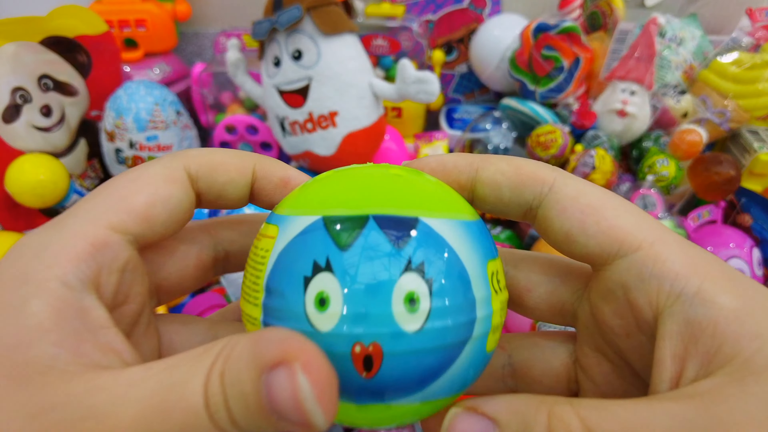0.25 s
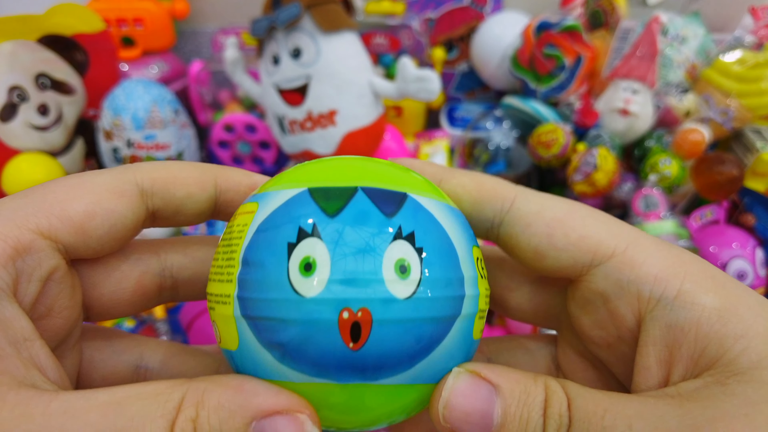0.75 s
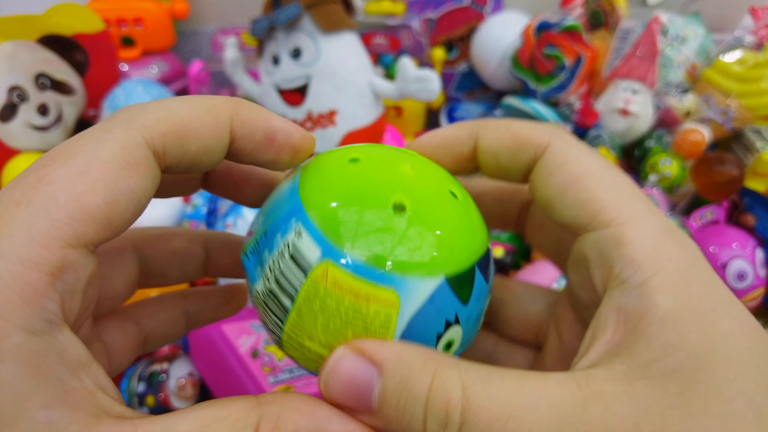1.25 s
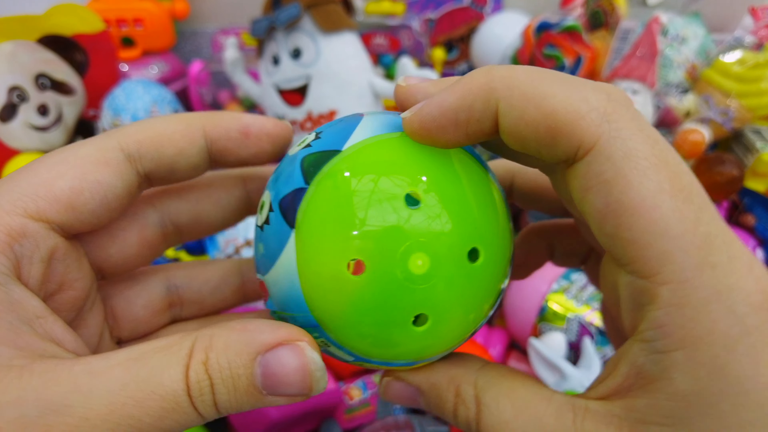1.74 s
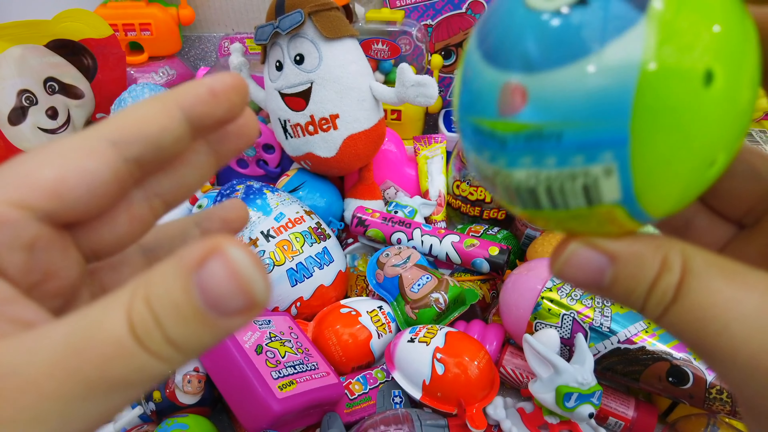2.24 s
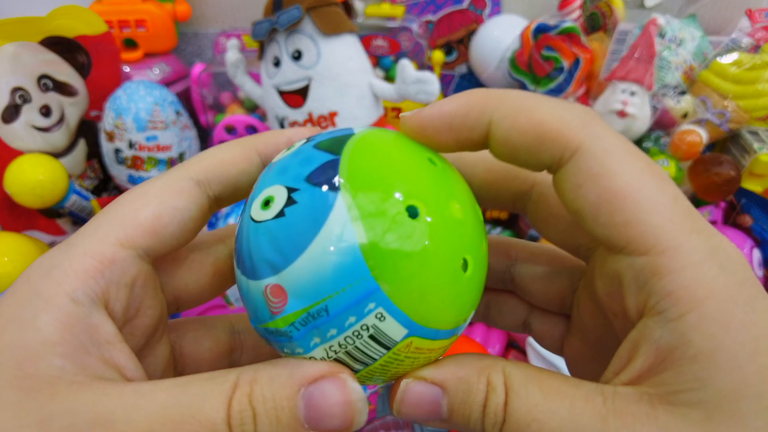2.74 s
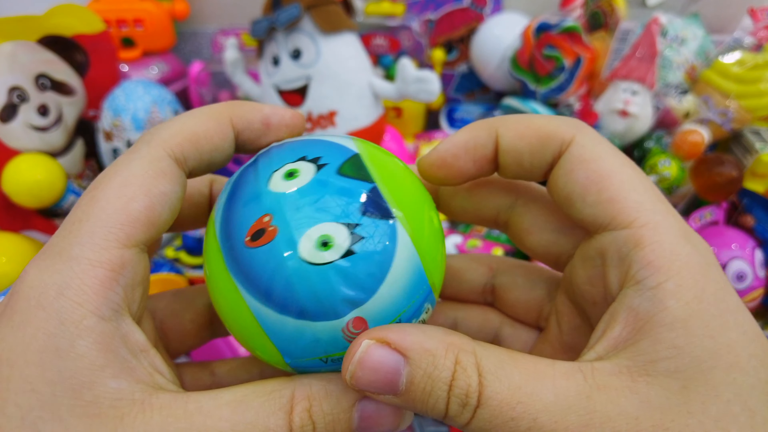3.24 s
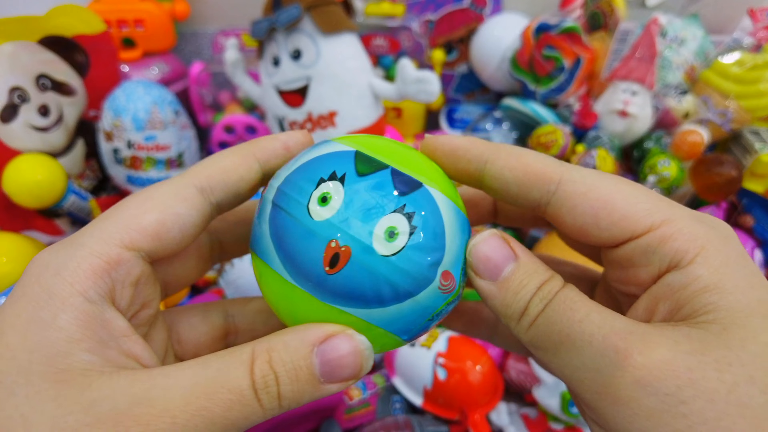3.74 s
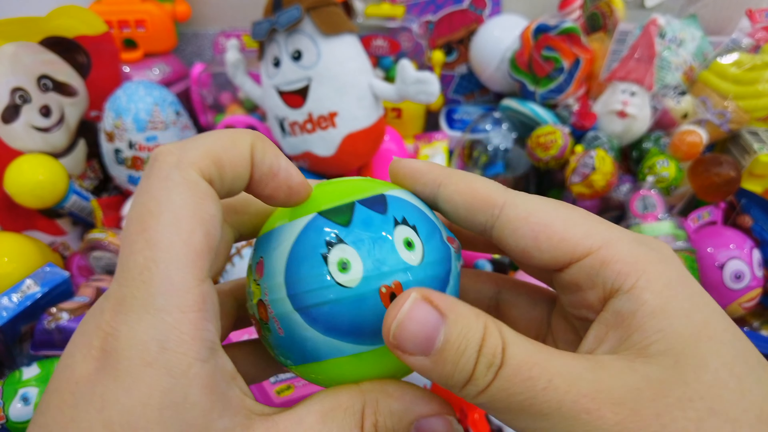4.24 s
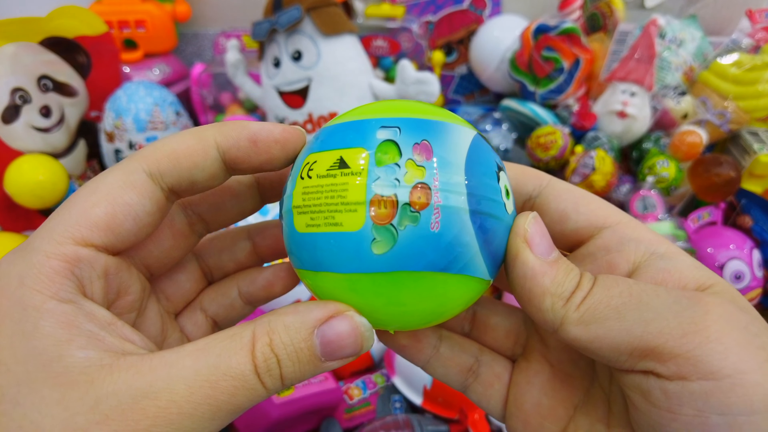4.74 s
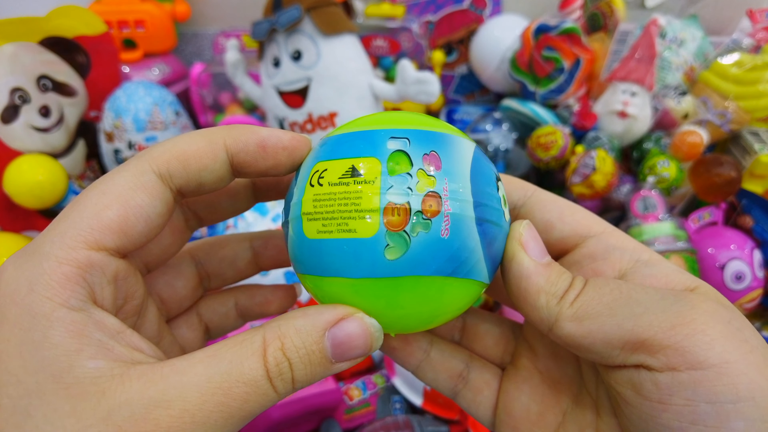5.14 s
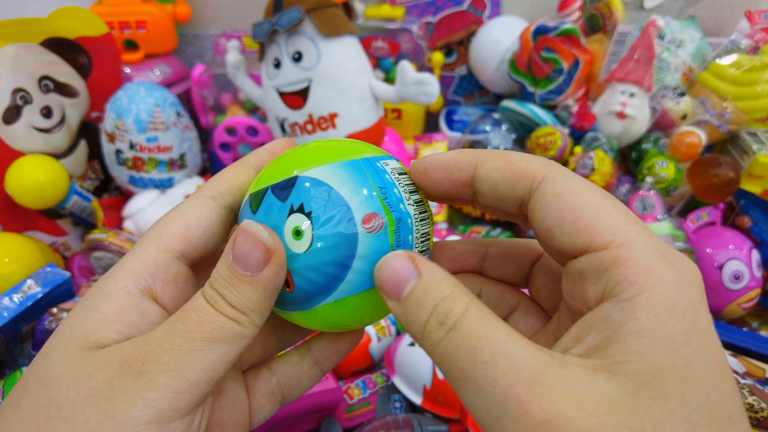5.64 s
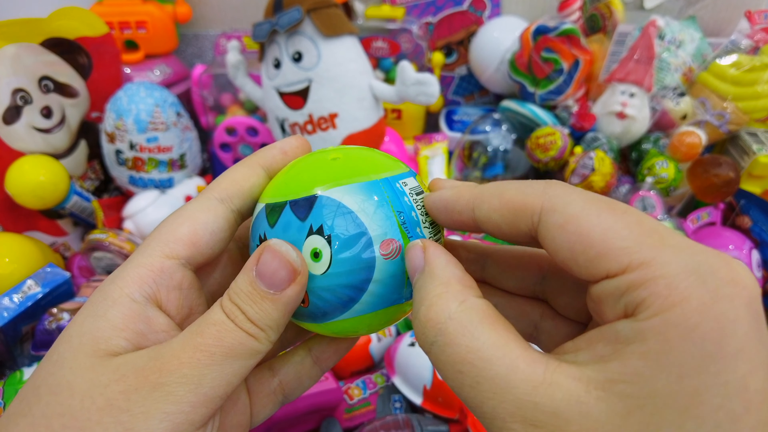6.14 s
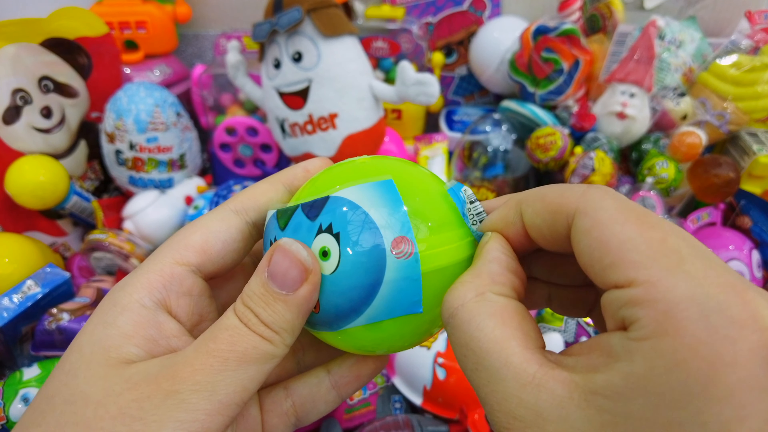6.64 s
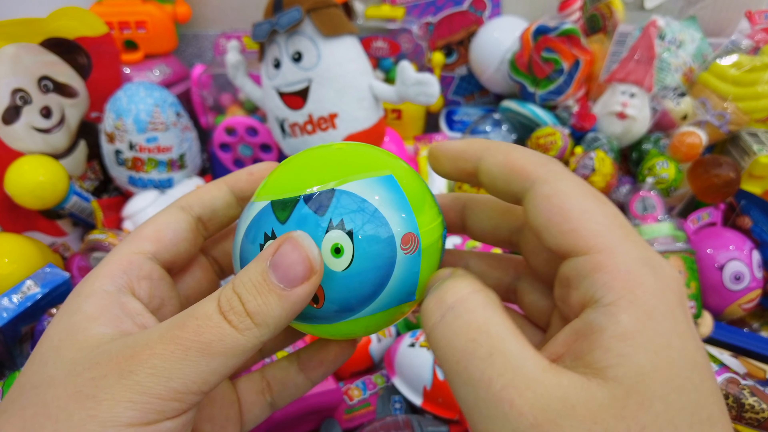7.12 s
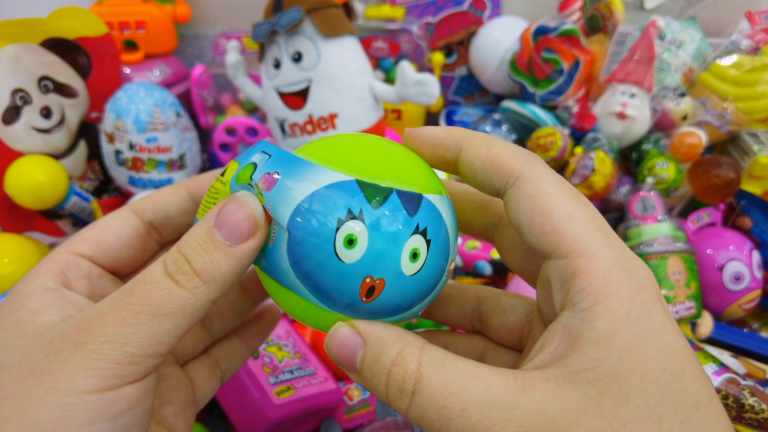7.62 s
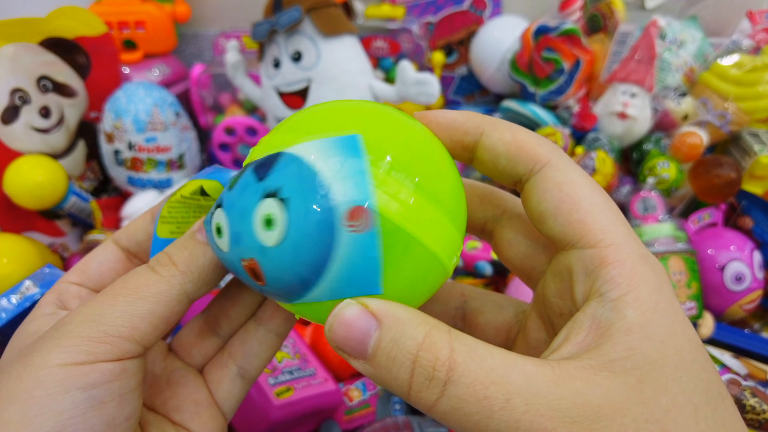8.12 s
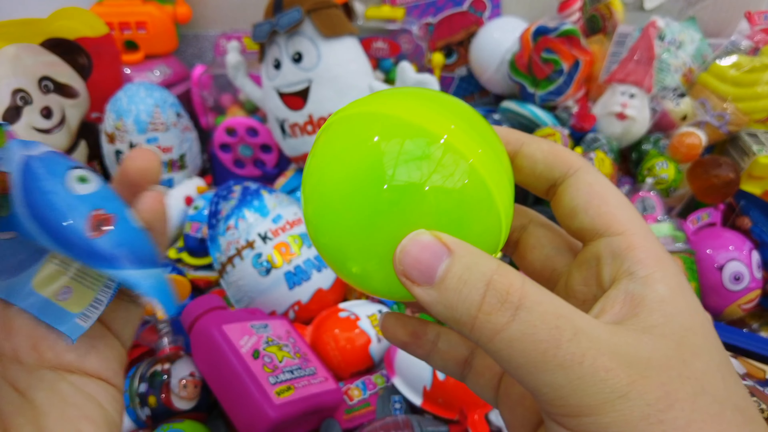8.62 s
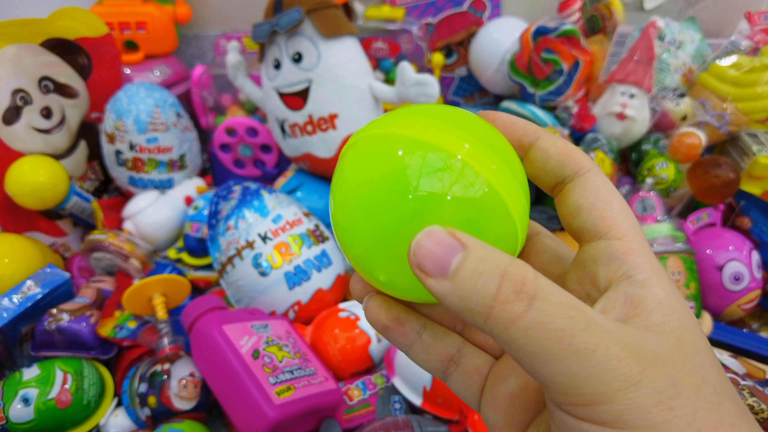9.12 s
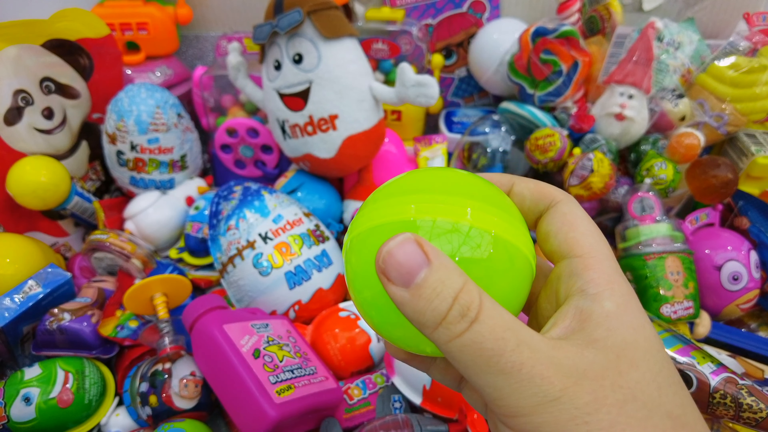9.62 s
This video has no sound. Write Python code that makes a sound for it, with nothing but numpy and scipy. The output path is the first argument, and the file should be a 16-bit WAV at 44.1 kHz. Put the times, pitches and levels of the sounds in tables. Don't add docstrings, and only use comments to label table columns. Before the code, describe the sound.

A small toy knocks and rattles inside a hollow plastic ball being turned, then tight plastic film tears, peels off and is crushed loudly.

```python
import sys
import numpy as np
from scipy import signal
from scipy.fft import rfft, irfft, next_fast_len
from scipy.io import wavfile
from scipy.ndimage import map_coordinates

SR = 44100
rng = np.random.default_rng(int(sys.argv[2]) if len(sys.argv) > 2 else 0)


def volts_from_db(level):
    exponent = np.asarray(level, float) / 20
    return 10 ** exponent


def wav_out(sig):
    wavfile.write(sys.argv[1], SR, np.round(np.clip(np.atleast_2d(sig).T, -1, 1) * 32767).astype(np.int16))


N = 435266

# [t/s, peak level/dB, ring f/Hz, share over 5.5 kHz level/dB]
FILM_SNAPS = [(6.3671, -9.5, 4400, -4.5), (6.3942, -14.5, 4800, 16.5), (6.4261, -17, 7750, 4),
              (6.487, 4, 7700, 1), (6.5345, 8.5, 4400, -7), (6.6199, -8.5, 2540, 3),
              (6.6254, -11, 1700, 8.5), (6.6356, -5, 2820, -7.0), (6.9256, -32.5, 3960, 7.5),
              (7.0251, -12, 2840, -9), (7.0496, -2.5, 4300, -3), (7.0543, -1.5, 2770, -4.5),
              (7.0598, -5.5, 6670, 8), (7.1797, 5.5, 7470, -6), (7.2139, -7, 8130, 5.5),
              (7.345, -18, 2320, -31), (7.374, -3, 3500, -12), (7.3881, -8.5, 4340, -21),
              (7.4356, -15, 4440.0, 2), (7.4651, -16.5, 1660, -19),
              (7.574, 1, 4940, 0.5), (7.5876, -7.5, 2760, -41), (7.7747, -7.5, 3380, -6.5),
              (7.787, -6.5, 1510, -37.5), (7.8183, -2, 2920, -4.5), (7.854, -0.5, 2470, -15.5),
              (7.8679, -6, 1720, -6.5), (7.9234, -11, 1500, -18.5), (8.037, -12, 3200, -10),
              (8.0758, -10, 3470, -7.5), (8.0844, -11, 2610, -7), (8.145, -4.5, 3250, -13),
              (8.1493, -1.5, 6100, -1.5), (8.176, -4.5, 1466, -3), (8.2758, -1, 6500, -20),
              (8.3303, -6.5, 4440, 0.5), (8.3394, -8, 3690, -1.5), (8.3809, 5.5, 7900, -5),
              (8.3966, -2.5, 1420, -15), (8.4104, 1.5, 7840, -2), (8.4149, 4, 4690, -18),
              (8.4472, -5.5, 5500, -17), (8.4792, 1.5, 3170, -11.5), (8.5081, 3, 5550, -16.5),
              (8.5155, -8.5, 6020, 16.5), (8.5905, -10.5, 2600, -21), (8.6265, -10.5, 2620, -1),
              (8.6373, -2.5, 4010, -10), (8.6572, -15, 3220, -9.5),
              (8.755, 8.5, 2920, -2), (8.7999, 13.5, 4750, -21.5), (8.806, -8, 6220, 11),
               (8.8367, -1, 1780, -2), (8.8603, -5, 1770.0, -16), (8.8647, 2, 1740, 0.5),
               (8.9477, -6.5, 2420, -31), (8.9548, -16.5, 3800, -9), (8.9661, 3.5, 5830, -7),
               (9.0045, 1, 3250, -22), (9.0124, 0, 7540, -4), (9.0706, -4.5, 1830, -13),
               (9.0839, -3, 3080, -24), (9.1321, -3, 3150, -7), (9.1988, -7.5, 1790, -7),
               (9.203, -8, 6000, -2), (9.2078, -6.5, 2930, -33), (9.2728, -10.5, 8450, 4.5),
              (9.3549, -13, 8050, 2), (9.3982, -7.5, 2400, -3), (9.418, -5, 5000.0, -10),
                 (9.4568, -1, 2660, -3), (9.4933, -4, 2650, -21), (9.5006, -9.5, 5670, 0),
                 (9.5172, 4, 7200, -20.5), (9.529, -5, 1450, 6.5), (9.5453, 2, 5000.0, -6.5),
                 (9.5746, 1, 6000, -23.5), (9.5793, -6, 4130, -18.5), (9.6563, -3, 4260, -4),
                 (9.6873, 0.5, 4320, -7), (9.7258, -7.5, 8400, -1), (9.7635, -13.5, 3140, -6),
                 (9.8516, 0.5, 7730, -8.5)]
# [t/s, level/dB, hold t/s]
PULLS = [
    (6.9, -41, 0.076),
    (8.58, -26, 0.052),
    (9.22, -41.5, 0.45),
    (7.387, -31.5, 0.0086),
    (7.49, -31.5, 0.01),
    (8.14, -16.5, 0.03),
    (8.4, -14, 0.026),
    (8.85, -16, 0.0067),
    (8.93, -22.5, 0.19),
    (9.52, -18, 0.038),
]
# [f/Hz, level/dB per Hz]
FILM_COLOUR = [(700, -30), (1200, 0), (1600, -3.5), (2600, -6), (5300, -7), (8000, -17), (16000, -14)]
# [t/s, level/dB]
FILM_ON_BALL = [
    (6.3, -14),
    (7.3, -20.5),
    (7.8, -10.5),
    (8.6, -13.5),
    (8.75, -19.5),
    (9.87, -22),
]
# [t/s, peak level/dB, brightness level/dB]
TOY_KNOCKS = [(0.0095, -24, -10.0), (0.109, -25, -6), (0.277, -31, -4), (0.7137, -32.5, -33),
              (1.2566, -18, 0), (1.367, -32, 5), (1.412, -18.5, 3.5), (1.871, -31.5, 7.5),
              (1.939, -10.5, -4), (1.953, -1.5, 8), (1.9652, -11.5, 21), (1.9705, -11.5, -0.5),
              (2.0219, -11.5, 9), (2.0273, -10.5, 2), (2.0344, 2.5, 2), (2.0398, -21, -4.0),
              (2.1109, -9.5, 19.5), (2.1177, -2.5, 5.5), (2.1634, -11.5, 7), (2.1877, -23, 1),
              (2.1935, -12, 5.5), (2.2205, -14, -25), (4.1, -26, 0), (4.2492, -24, -23), (4.6729, -22, -5),
              (4.7467, -25, -9), (5.431, -20, -23)]
# [t/s, level/dB, hold t/s]
TOY_ROLLS = [
    (0, -34.5, 0.026),
    (1.258, -38.5, 0.014),
    (1.363, -44, 0.055),
    (1.96, -19.5, 0.0058),
    (2.04, -17, 0.0043),
    (2.117, -17, 0.0026),
    (2.17, -25.5, 0.034),
    (4.68, -50.5, 0.13),
    (5.4, -48, 0.029),
    (4.07, -53, 0.036),
]
# [f/Hz, width f/Hz, level/dB]
SHELL_MODES = [(455, 48, -5.5), (861, 134, -1), (1338, 180, -2), (1636, 87, 2), (2933, 25, -3.5),
               (3133, 52, 1.5), (5830, 1500, 1)]
# [t/s, peak level/dB, ring f/Hz]
FINGER_TICKS = [(0.1104, -17.5, 7250), (0.2783, -28, 4440), (2.5985, -22, 14990), (2.6162, -27, 2930),
                (2.7923, -27.5, 2920), (2.8468, -23.5, 12490), (3.151, -19.5, 9600), (3.385, -20.5, 7200),
                (3.4583, -20, 14100), (1.2367, -24, 6540), (3.516, -25.5, 12400), (4.0647, -12.5, 4520),
                (4.1546, -26.5, 3020), (4.234, -22, 6000), (4.7462, -24, 8000), (5.3432, -34, 8700),
                (6.789, -30, 8900), (5.484, -28.5, 4090), (6.2568, -21, 4820)]
# [t/s, level/dB, hold t/s]
SKIN_STROKES = [(0, -49, .01), (.12, -46.5, .01), (.27, -54.5, .17), (.72, -59, .05), (1.177, -55.5, 0.424),
                (1.742, -48.5, 0.0042), (1.86, -52, 0.009), (2.61, -51.5, 0.31), (2.93, -55.5, 0.143),
                (3.149, -48.5, 0.056), (3.291, -36, 0.019), (3.5, -53, 0.19), (3.88, -40, 0.091),
                (4.069, -42.5, 0.016), (4.246, -46.5, 0.009), (4.36, -49, .08), (4.55, -47.5, 0.11),
                (5.3, -52.5, 0.38), (6.008, -54, 0.0074), (6.23, -55.5, .1)]
# [f/Hz, level/dB per Hz]
SKIN_COLOUR = [(1800, -47), (2600, 0), (4300, -7), (8000, -2.5), (16000, -20.5)]
# [t/s, peak level/dB, f/Hz, t60 t/s]
HAND_BUMPS = [(0.111, -22, 88.6, 0.042), (0.173, -26, 124.2, 0.62), (0.212, -35.5, 183, 0.8),
              (0.33, -35, 198.3, 1.2), (1.238, -13, 57, 0.059), (2.801, -20.5, 68.6, 0.033),
              (4.236, -18, 87, 0.061), (3.387, -36.5, 455, 0.12), (5.4305, -11, 1200, 0.0086),
              (5.462, -35.5, 281, 0.57), (5.954, -27, 45, 0.097), (1.952, -13.5, 207, 0.048),
              (2.032, -7.5, 207, 0.023), (6.488, -26, 150, 0.12), (6.253, -19, 61, 0.05),
              (5.952, -27, 290, 0.053), (6.139, -43.5, 276, 1), (7.69, -17.5, 300, 0.014),
              (7.85, -11, 153, 0.018), (7.86, -21, 260, 0.067), (8.273, -20.5, 175, 0.04),
              (8.377, -22.5, 249, 0.065), (9.456, -16.5, 546, 0.072)]
# [t/s, left lag/samples, left minus right level/dB]
HAND_PLACE = [
    (0, 3.5, -1),
    (3, 4, 0),
    (6.5, -1.1, 0),
    (7.5, -1.12, -0.2),
    (8.3, -1, 0.7),
    (8.8, -4.0, 1),
    (9.87, -4, 1.5),
]
# [t/s, deep level/dB, boom level/dB]
HOUSE_RUMBLE = [(0, -34, -36.5), (.95, -39, -45.5), (3.6, -42, -46), (5.3, -40, -45.5),
                (9.87, -39.5, -48.5)]
# [f/Hz, level/dB per Hz]
BACKGROUND_COLOUR = [(15, -57.5), (25, -10.5), (79, -16.5), (108, -11.5), (187, -13.0), (257, -18.5), (316, -11.0),
                     (422, -29.0), (1270, -38.5), (13000, -55.5), (13500, -100)]
# [f/Hz, likeness/ratio]
AIR_LIKENESS = [(60, 0.94), (130, 0.96), (290, 0.69), (640, 0.023), (15000, 0.14)]
# [start t/s, end t/s]
BRIEF_GAPS = [
    (6.3445, 6.3555),
    (7.5495, 7.5635),
]


def creases(rows, own, ring_share, width, length_ms, gain_db):
    s, db, hz, top_db = np.transpose(rows)
    x = bursts(length_ms * volts_from_db(0.021 * db), own)
    ring = [resonate(one, patch_hz, width * patch_hz) for one, patch_hz in zip(x, hz)]
    ring = peak_one(np.array(ring))
    crack = peak_one(peak_one(band(x, 1415, 8700)) + ring_share * ring)
    top = volts_from_db(top_db)[:, None, None] * peak_one(band(x, 5500, 24000))
    size = volts_from_db(db + gain_db)[:, None, None]
    push = peak_one(band(x[:, :1], 154, 2580))
    return lay(s, size * (crack + top)), lay(s, size * push)


def film_effort(snaps):
    tail_db, settle_db_per_s = -27.5, 180
    tails = strokes([(s, db + tail_db, 0) for s, db, *_ in snaps], 1100, settle_db_per_s)
    pulls = strokes(PULLS, rise_db_per_s=177, fall_db_per_s=178)
    both = np.hypot(volts_from_db(tails[:, 1]), volts_from_db(pulls[:, 1]))
    return np.c_[tails[:, 0], 20 * np.log10(both)]


def crackle(curve, spectrum, per_s, spread_db, smooth, cycles, patchy_db, gain_db):
    x, level = grains(curve, per_s, spread_db, smooth)
    patches_hz = np.geomspace(1200, 15500, num=12)
    dealt = rng.integers(0, 12, N // 8 + 1).repeat(8)[:N]
    out = 0
    for k, hz in enumerate(patches_hz):
        gain_curve_db = at_hz(spectrum, hz) + patchy_db * drift(14)[::8]
        gain = volts_from_db(gain_curve_db).repeat(8)[:N]
        out = out + gain * resonate(x * (dealt == k), hz, hz / cycles)
    return volts_from_db(gain_db) * level * rms_one(out)


def film_rustle(snaps, on_ball_db):
    x = crackle(film_effort(snaps), FILM_COLOUR, per_s=1800, spread_db=5.0, smooth=1.0, cycles=4.7,
                patchy_db=2.5, gain_db=-1.5)
    return band(x, 1010, 22000) + volts_from_db(on_ball_db + 16) * band(x, 290, 1100)


def rattle():
    s, db, bright_db = np.transpose(TOY_KNOCKS)
    x = bursts(np.full(len(s), .3), own=.4)
    dull = peak_one(band(x, 250, 1900))
    hard = volts_from_db(bright_db)[:, None, None] * peak_one(band(x, 1770, 7300))
    knocks = lay(s, volts_from_db(db)[:, None, None] * (dull + hard))

    rolling = strokes(TOY_ROLLS, rise_db_per_s=758, fall_db_per_s=432.5)
    chatter, level = grains(rolling, per_s=600, spread_db=9.5, smooth=0.93)
    low = rms_one(band(chatter, 150, 2070))
    high = level ** 0.31 * rms_one(band(chatter, 1800, 8600))
    contact = knocks + volts_from_db(-3.5) * level * (low + volts_from_db(6.5) * high)
    return volts_from_db(10.5) * shell(contact + 1e-18) + contact


def shell(x):
    out = 0
    for k, (hz, width, db) in enumerate(SHELL_MODES):
        out = out + (-1) ** k * volts_from_db(db) * resonate(x, hz, width) / np.sqrt(width / 100)
    return out


def finger_ticks():
    rows = [(s, db, hz, -3.0) for s, db, hz in FINGER_TICKS + nail_drag()]
    ticks, _ = creases(rows, own=1.0, ring_share=1.0, width=0.15, length_ms=1.0, gain_db=-1.0)
    return ticks


def nail_drag(count=9):
    start_s, gap_s, level_db, pitch_hz = 3.279, .0098, -18.5, 9870
    chance = rng.uniform(-1, 1, (count, 2))
    return [(start_s + gap_s * (k + 0.24 * a), level_db, pitch_hz * (1 + 0.08 * b))
            for k, (a, b) in enumerate(chance)]


def skin_brush():
    curve = strokes(SKIN_STROKES, rise_db_per_s=326, fall_db_per_s=209.5)
    return crackle(curve, SKIN_COLOUR, per_s=6700, spread_db=-14.0, smooth=10.0, cycles=9.3,
                   patchy_db=5.0, gain_db=-5.0)


def bumps():
    t = np.arange(SR // 2) / SR
    out = np.zeros(N + len(t))
    for s, db, hz, t60 in HAND_BUMPS:
        fade = volts_from_db(-60 * t / t60) * np.clip(t * hz * 3.1, 0, 1)
        stir = resonate(rng.standard_normal(len(t) + 2000), hz, 0.51 * hz)
        rub = rms_one(resonate(stir, hz, 0.51 * hz)[2000:])
        ring = np.sin(2 * np.pi * hz * t)
        i = round(s * SR)
        out[i:i + len(t)] += volts_from_db(db) * fade * (ring + 3.43 * min(t60, .3) * rub)
    return out[:N]


def placed(x):
    lag, pan_db = in_time(HAND_PLACE)
    at = np.arange(N)
    ports = []
    for port, side in zip(x, (1, -1)):
        moved = map_coordinates(port, [at - side * lag / 2], order=2)
        ports.append(volts_from_db(side * pan_db / 2) * moved)
    return np.array(ports)


def room(x):
    t60_s, tail_db, echo_s, echo_db = 0.35, -14.5, .0045, -16.5
    bands = [(150, 980, 1.0, 2.5, 0.9), (1200, 12200, 0.86, -5.5, 0.62), (5000, 8200, 0.13, 4.0, 8.8)]
    t = np.arange(SR // 2) / SR
    tail = 0
    for low_hz, high_hz, longer, db, own in bands:
        shared, *sides = rng.standard_normal((3, len(t)))
        noise = rms_one(shared + own * np.array(sides))
        tail = tail + band(noise, low_hz, high_hz) * volts_from_db(db - 60 * t / (t60_s * longer))
    tail = tail * np.clip(t / 0.0033, 0, 1)
    tail = volts_from_db(tail_db) * tail / np.sqrt(np.sum(tail ** 2) / 2)
    tail[:, round(echo_s * SR)] += volts_from_db(echo_db)
    return signal.fftconvolve(x, tail, axes=1)[:, :N]


def floor():
    deep_db, boom_db = in_time(HOUSE_RUMBLE)
    mid, side = rng.standard_normal((2, N))
    alike = [(hz, np.clip(c, -.99, .99)) for hz, c in AIR_LIKENESS]
    mid = coloured(mid, [(hz, 10 * np.log10(1 + c)) for hz, c in alike])
    side = coloured(side, [(hz, 10 * np.log10(1 - c)) for hz, c in alike])
    air = coloured(mid + side * [[1], [-1]], BACKGROUND_COLOUR)
    hiss = volts_from_db(-50) * rms_one(band(air, 399, 19000))
    hum = 2.22 * resonate(air, 38.3, 3.05) + .5 * resonate(air, 77, 6.8)
    deep = rms_one(band(air, 29.3, 103.5) + hum)
    boom = rms_one(band(air, 100.6, 286) + 1.44 * resonate(air, 130.8, 13))
    return hiss + volts_from_db(deep_db) * deep + volts_from_db(boom_db) * boom


def bursts(length_ms, own):
    t = np.arange(700) / SR * 1000 - 4
    t = t / np.clip(length_ms, .1, 3)[:, None, None]
    noise = rng.standard_normal((len(length_ms), 3, 700))
    swell = np.where(t < 0, np.exp(1.29 * np.minimum(t, 0)), np.exp(-np.maximum(t, 0)))
    return swell * (noise[:, :1] + own * noise[:, 1:])


def lay(times, sounds):
    out = np.zeros((2, N + 2000))
    for s, sound in zip(times, sounds):
        i = round((s - .004) * SR) + 500
        out[:, i:i + sound.shape[1]] += sound
    return out[:, 500:N + 500]


def grains(curve, per_s, spread_db, smooth):
    before, after = (curve[0][0] - .01, -120), (curve[-1][0] + 0.0059, -120)
    level_db, = in_time([before, *curve, after])
    born = rng.random(N) < per_s * volts_from_db(5 * drift(60)) / SR
    size = volts_from_db(spread_db * np.minimum(rng.exponential(1, N), 3))
    clicks = born * size * rng.choice([-1, 1], N)
    return rms_one(clicks) + smooth * rng.standard_normal((2, N)), volts_from_db(level_db)


def strokes(rows, rise_db_per_s, fall_db_per_s):
    t = np.arange(0, N + 64, 64)[:, None] / SR
    s, db, hold = np.transpose(rows)
    rise_lost_db = rise_db_per_s * np.maximum(s - t, 0)
    fall_lost_db = fall_db_per_s * np.maximum(t - s - hold, 0)
    lost_db = np.minimum(rise_lost_db + fall_lost_db, 150)
    power = np.sum(volts_from_db(db - lost_db) ** 2, axis=1) + 1e-12
    return np.c_[t, 10 * np.log10(power)]


def resonate(x, hz, width_hz):
    r = np.exp(-np.pi * width_hz / SR)
    feed = np.array([1, 0, -1]) * (1 - r * r) / 2
    return signal.lfilter(feed, [1, -2 * r * np.cos(2 * np.pi * hz / SR), r * r], x)


def band(x, low_hz, high_hz):
    sos = signal.butter(2, [low_hz, min(high_hz, .45 * SR)], "band", fs=SR, output="sos")
    return signal.sosfilt(sos, x)


def coloured(x, spectrum):
    size = next_fast_len(N)
    hz = np.arange(size // 2 + 1) * SR / size
    return irfft(rfft(x, size) * volts_from_db(at_hz(spectrum, hz)), size)[..., :N]


def at_hz(points, hz):
    points_hz, db = np.transpose(points)
    return np.interp(np.log(np.maximum(hz, 1)), np.log(points_hz), db)


def in_time(rows):
    s, *columns = np.transpose(rows)
    return [np.interp(np.arange(N) / SR, s, c) for c in columns]


def drift(rate):
    knots = rng.standard_normal(2000)
    return np.interp(np.arange(N) / SR * rate, np.arange(2000), knots)


def rms_one(x):
    return x / np.sqrt(np.mean(x ** 2) + 1e-20)


def peak_one(x):
    return x / np.abs(x).max(axis=(-2, -1), keepdims=True)


def scene():
    on_ball_db, = in_time(FILM_ON_BALL)
    all_snaps = FILM_SNAPS
    snaps, push = creases(all_snaps, own=0.76, ring_share=0.6, width=0.11, length_ms=1.2, gain_db=4.5)
    film = snaps + film_rustle(all_snaps, on_ball_db) + volts_from_db(on_ball_db) * push
    hands = placed(film + rattle() + finger_ticks() + skin_brush())
    background = (floor() + bumps()) * volts_from_db([[-.7], [.7]])
    return hands + room(hands) + background


def low_pass(x):
    return signal.sosfilt(signal.butter(12, 16360, fs=SR, output="sos"), x)


def record(dry):
    t, gain = np.arange(N) / SR, 1
    for start, end in BRIEF_GAPS:
        outside_s = np.maximum(start - t, t - end)
        gain = gain * np.clip(outside_s / 0.00068, .003, 1)
    mix = np.clip(dry * gain, -1, 1)
    return low_pass(mix)


dry = scene()
out = record(dry)
wav_out(out)
```